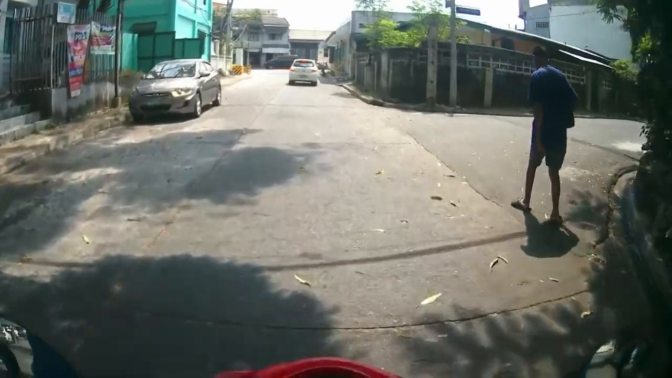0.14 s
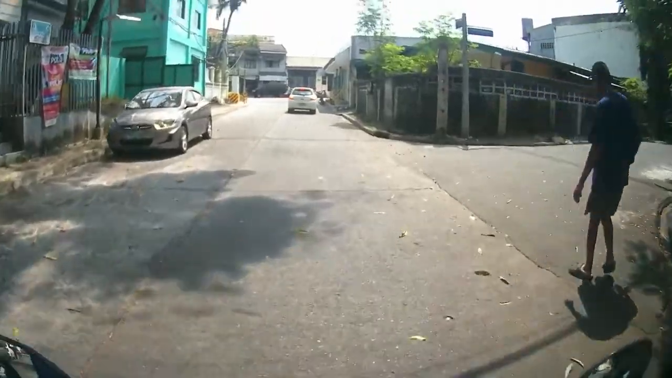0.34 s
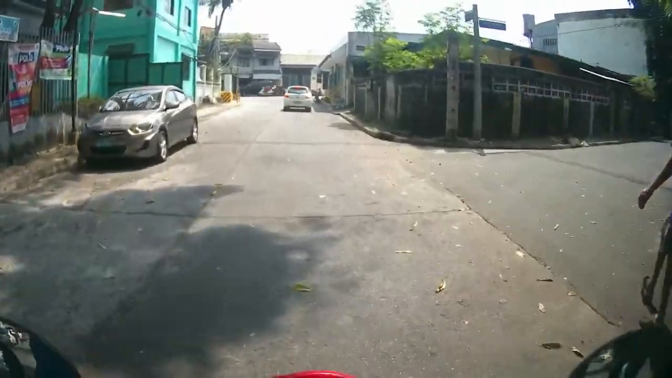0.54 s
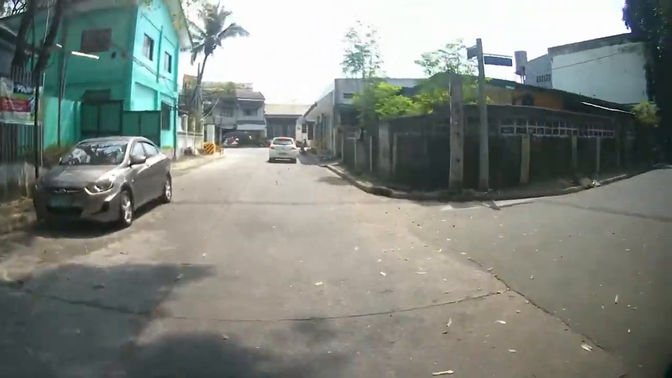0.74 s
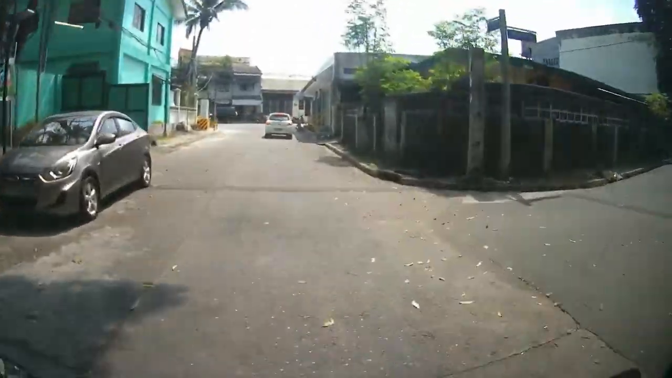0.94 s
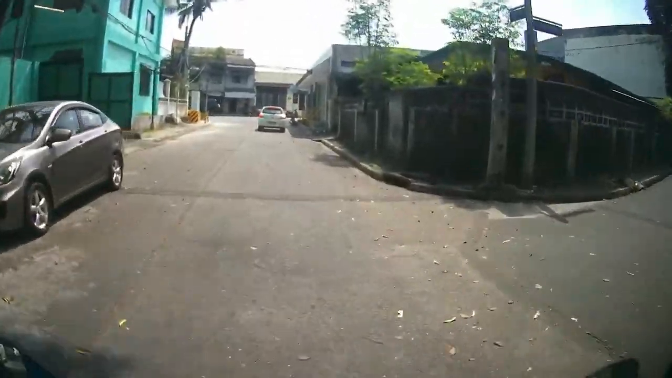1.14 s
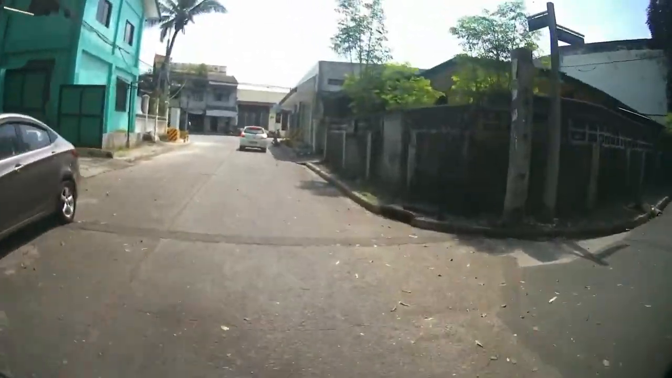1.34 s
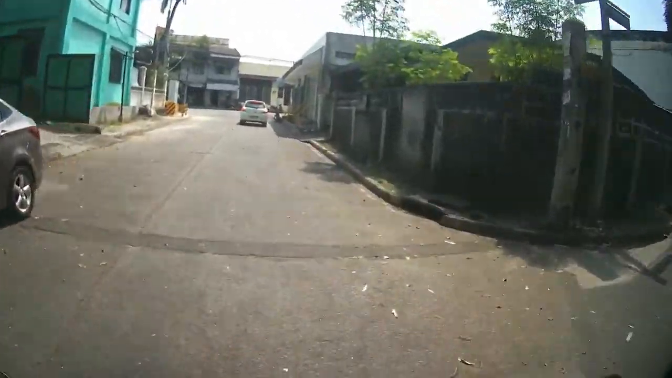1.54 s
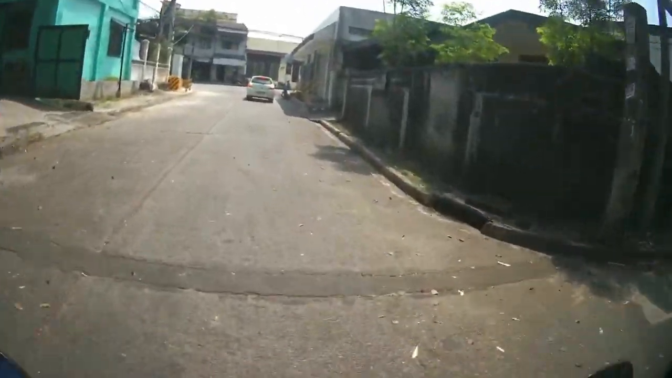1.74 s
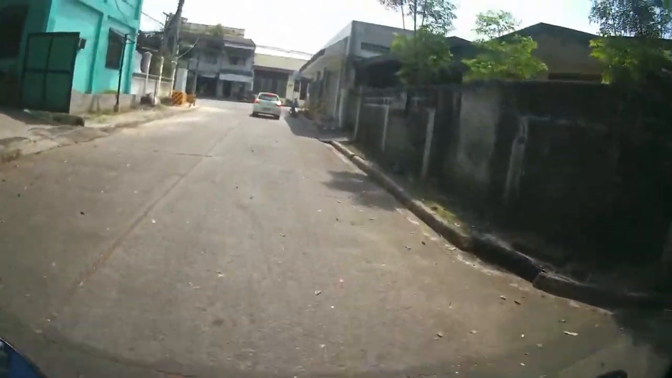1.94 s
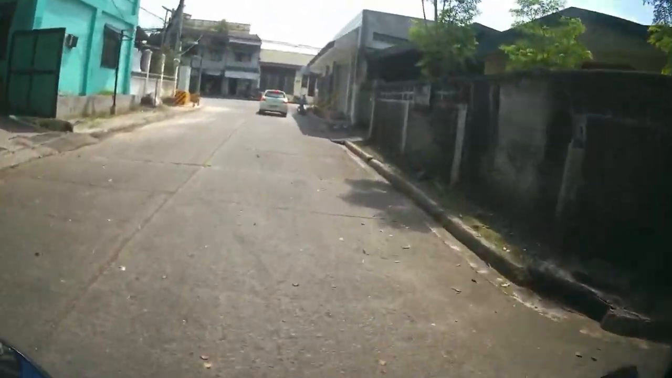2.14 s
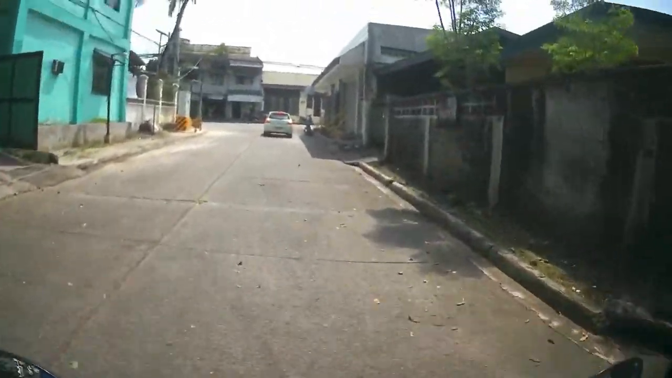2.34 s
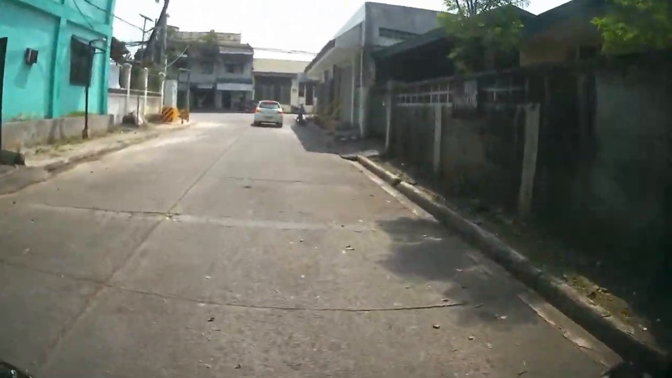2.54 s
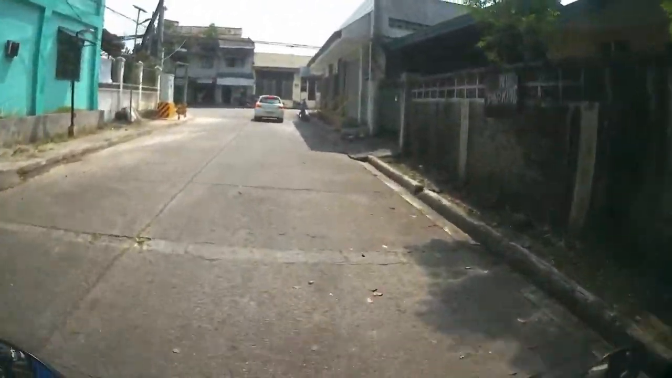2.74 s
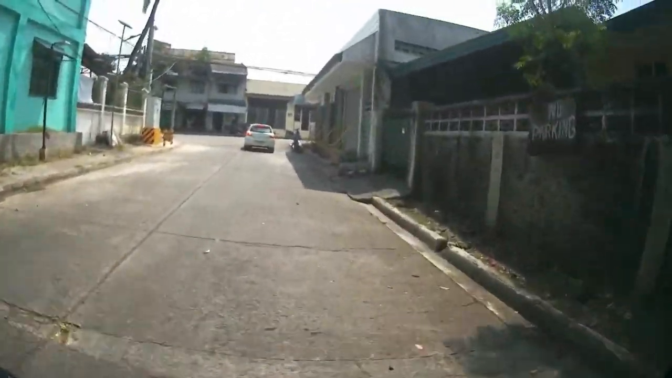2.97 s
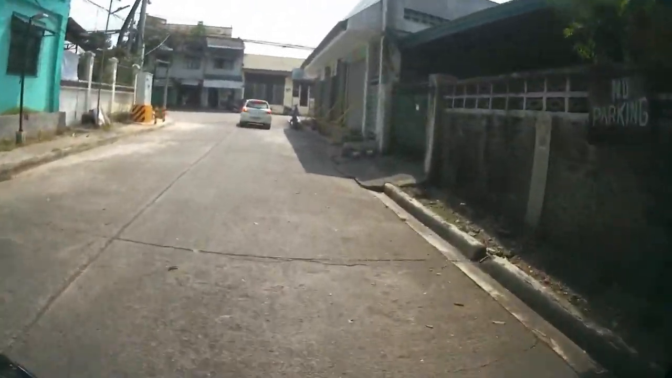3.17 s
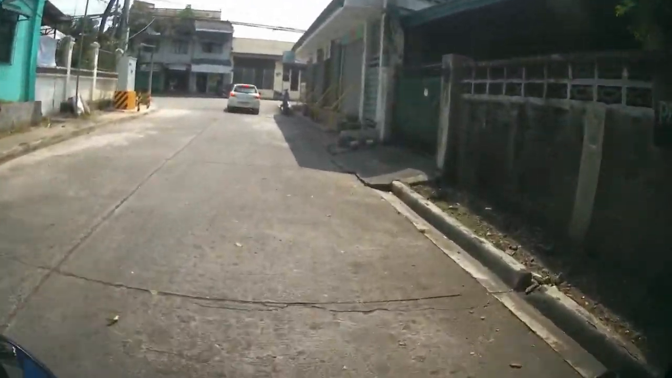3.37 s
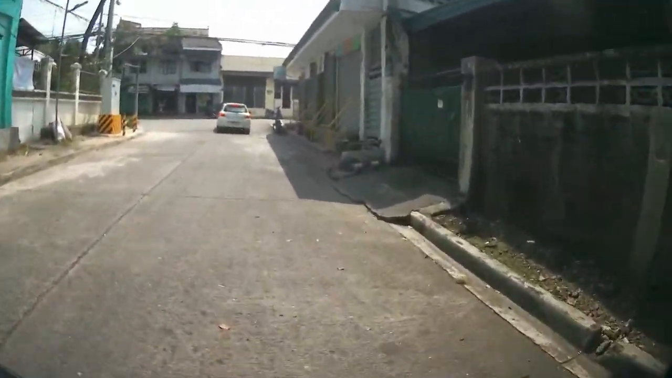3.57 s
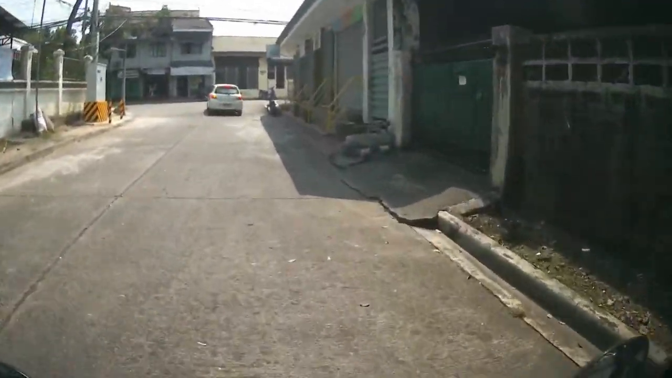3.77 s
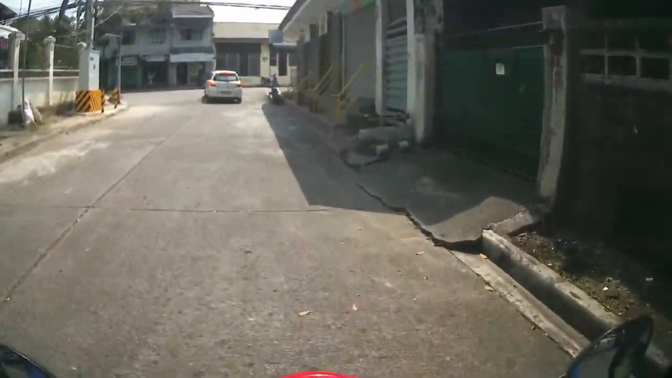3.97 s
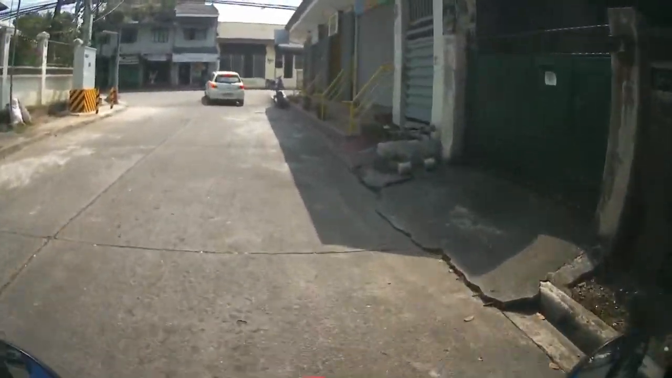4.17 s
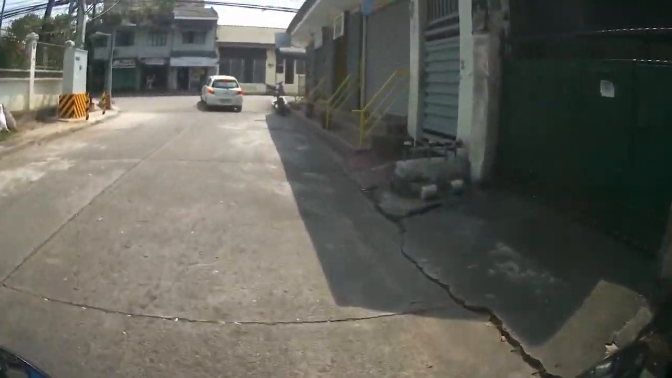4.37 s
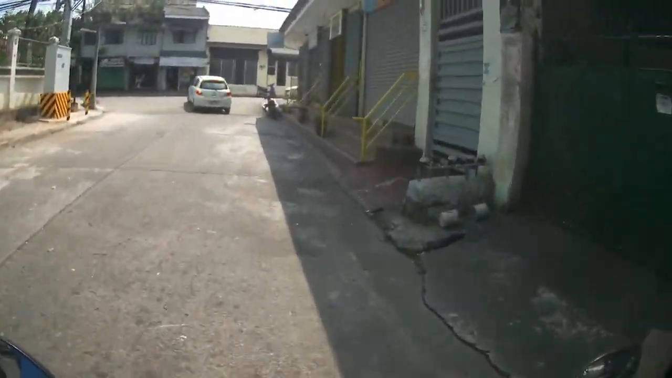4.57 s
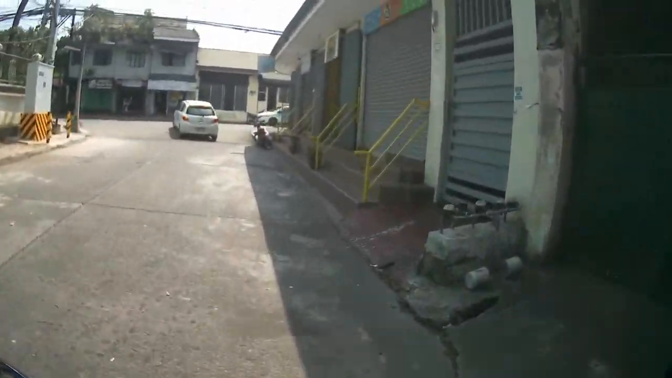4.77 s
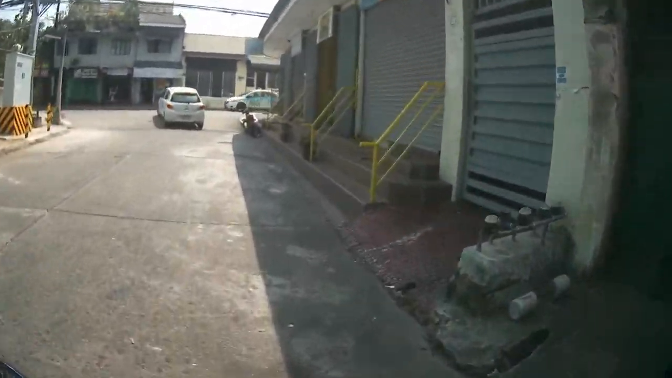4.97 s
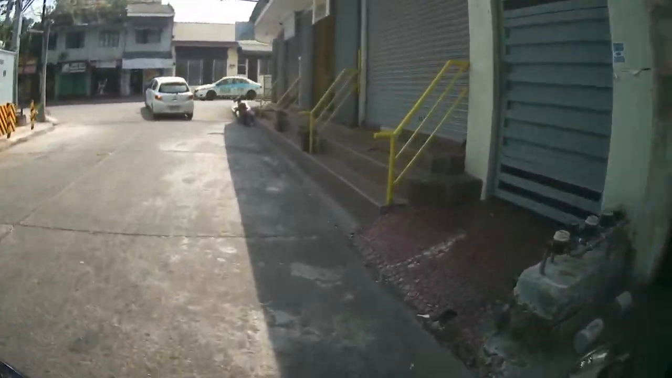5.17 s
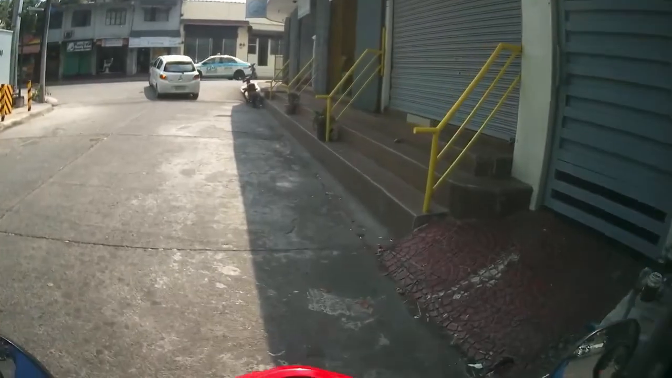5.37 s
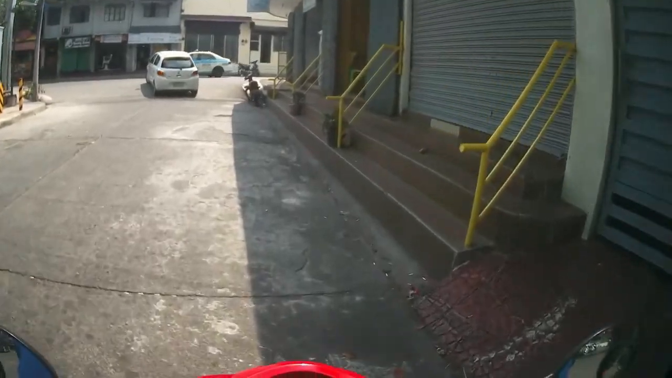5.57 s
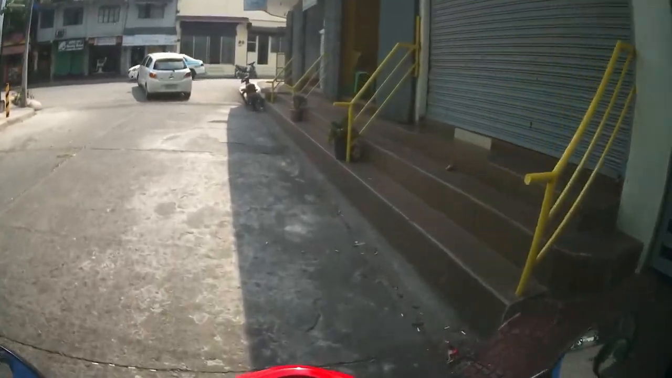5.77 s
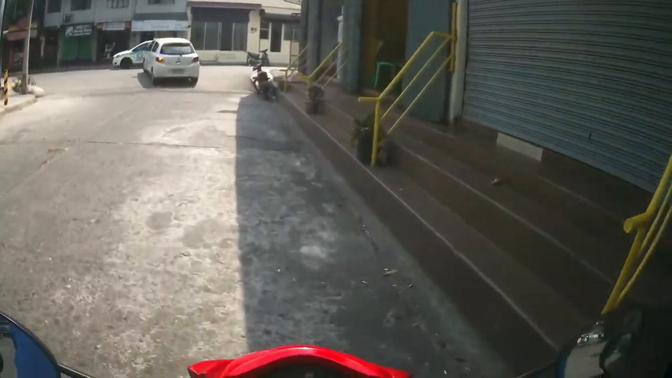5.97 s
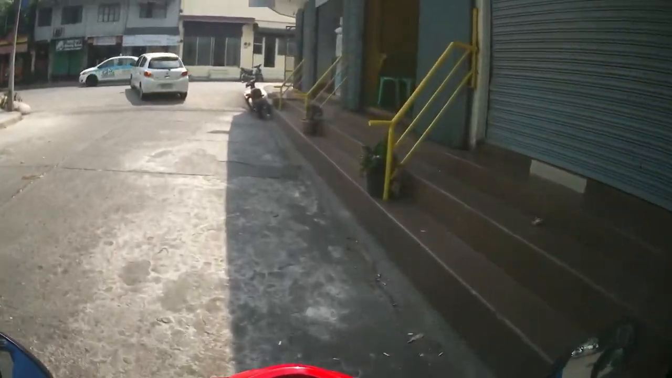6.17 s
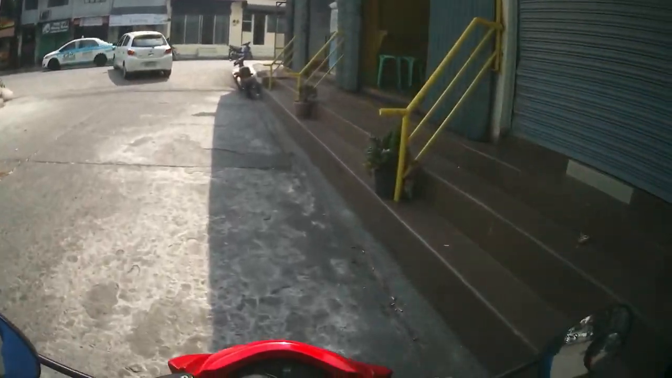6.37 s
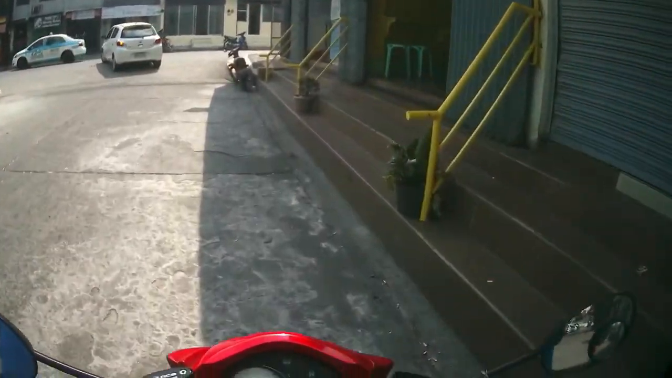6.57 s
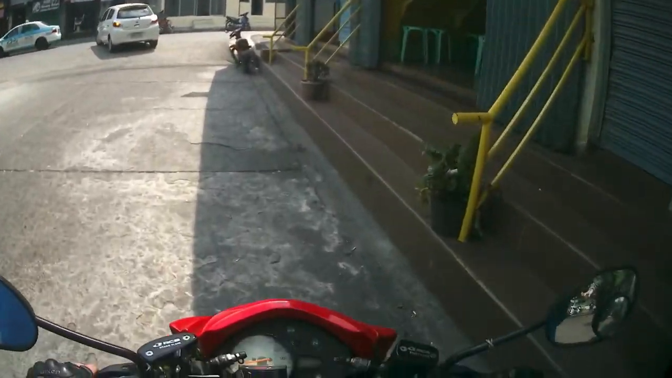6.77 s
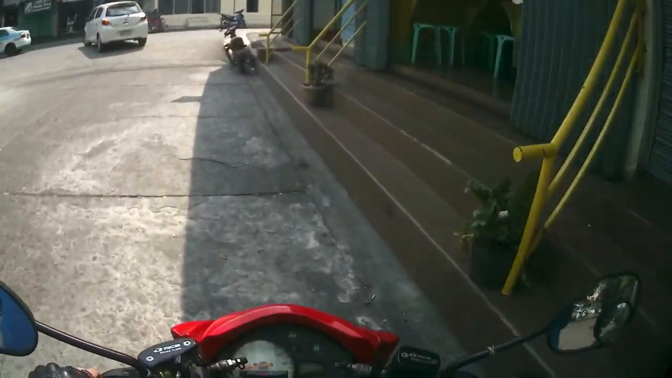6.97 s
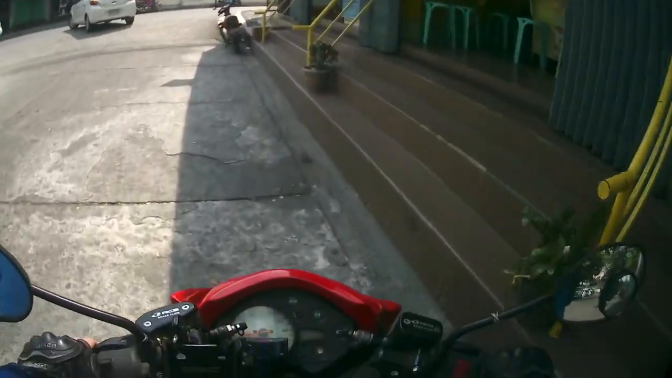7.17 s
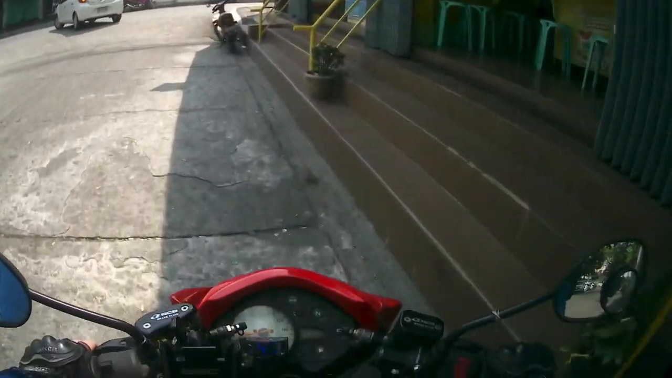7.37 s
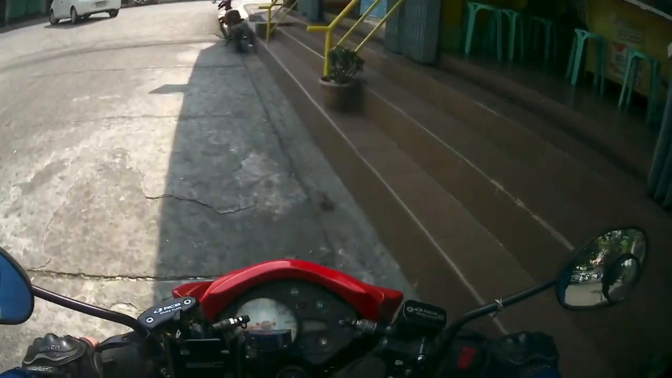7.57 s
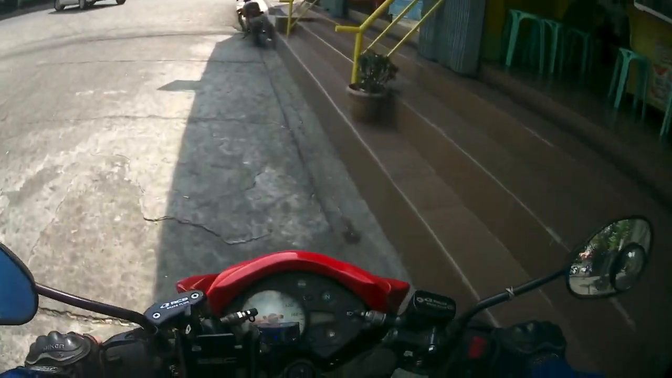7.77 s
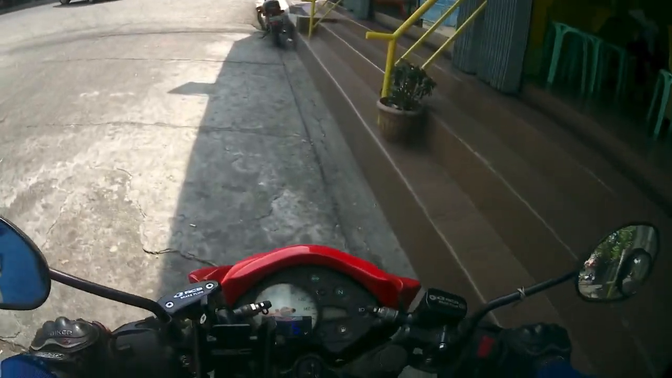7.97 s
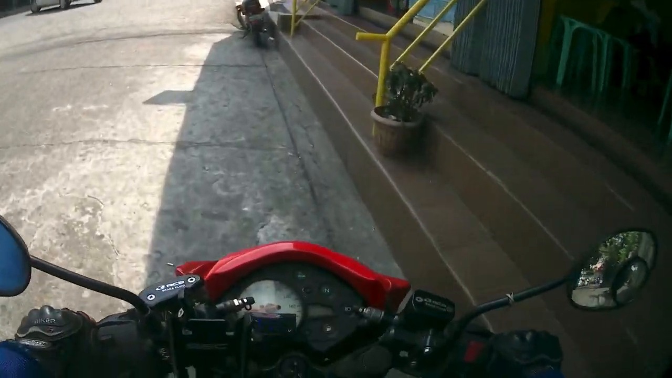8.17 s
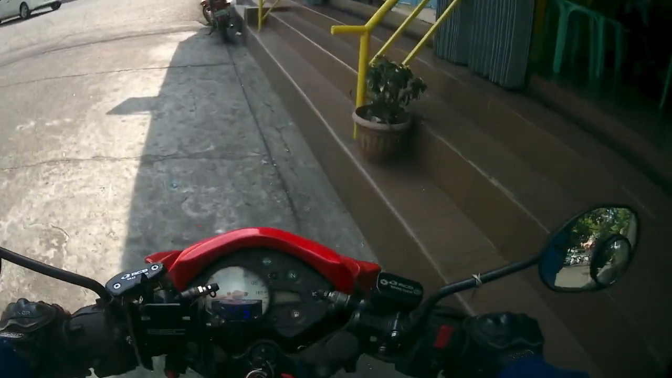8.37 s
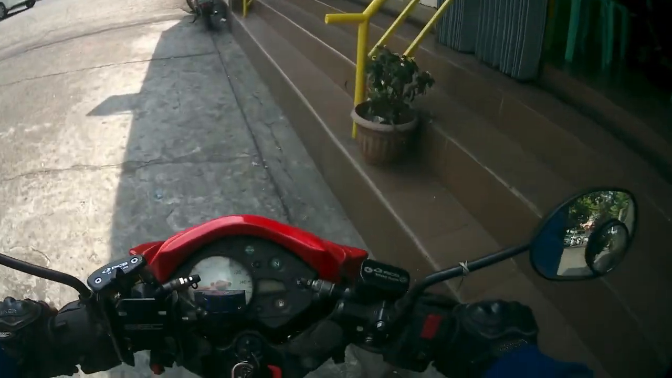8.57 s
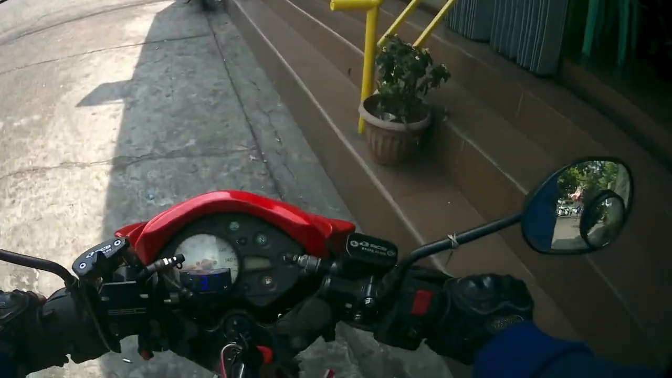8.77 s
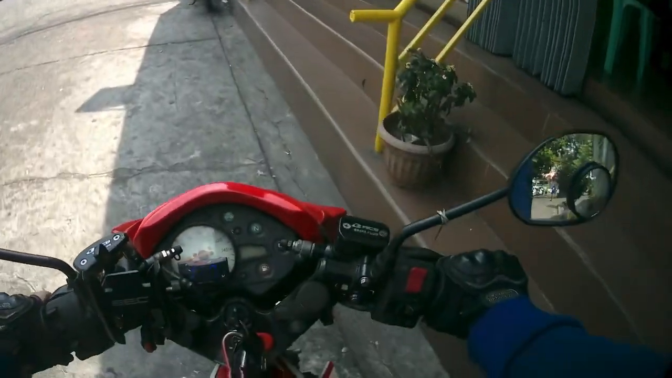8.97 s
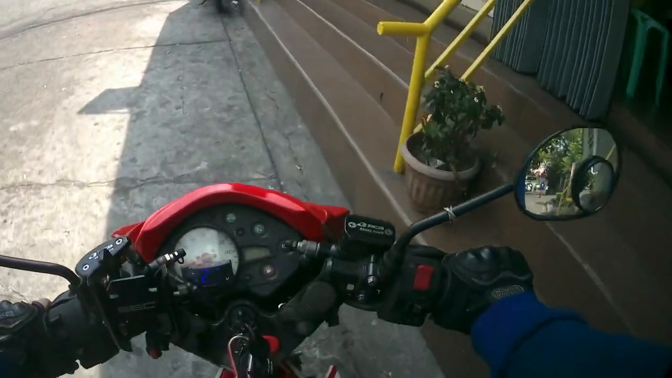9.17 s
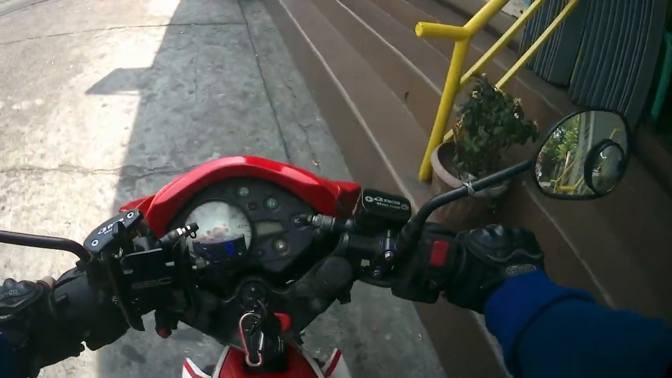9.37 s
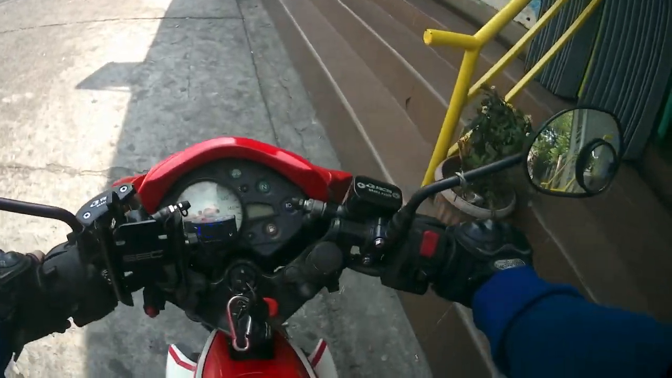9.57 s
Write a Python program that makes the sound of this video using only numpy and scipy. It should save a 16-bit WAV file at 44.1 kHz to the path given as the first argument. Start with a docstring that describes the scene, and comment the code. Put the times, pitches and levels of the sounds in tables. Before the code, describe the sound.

Heard from a helmet microphone inside a closed case, a small motorcycle rolls along a street. Deep buffeting and dull hiss surround a wavering low engine drone. The pitch sinks and the wind eases as the bike slows. After about seven seconds the drone becomes separate soft thuds, increasingly uneven, with small plastic ticks, faint brief peeps and a late rub of cloth.

```python
"""A small motorcycle slows to a stop, heard by a helmet camera in a closed case.
The engine is a sum of firing orders shaped by resonances of frame and helmet, then separate uneven thuds.
Wind is filtered noise: hiss in the case, buffeting of the helmet and a roar; a thin street hiss lies below.
Loose parts tick as struck resonances, cloth rubs as clumped noise, and faint sine tones peep.
The camera takes 8000 samples a second and joins them by straight lines, which leaves faint treble images."""
import sys
import numpy as np
from scipy import signal
from scipy.fft import rfft, irfft, next_fast_len
from scipy.io import wavfile
from scipy.ndimage import uniform_filter1d, map_coordinates

SR = 44100
rng = np.random.default_rng(int(sys.argv[2]) if len(sys.argv) > 2 else 0)


def wav_out(sig):
    """Save sig, one row per channel (or a flat mono array), as 16-bit PCM at SR to the path in sys.argv[1]."""
    wavfile.write(sys.argv[1], SR, np.round(np.clip(np.atleast_2d(sig).T, -1, 1) * 32767).astype(np.int16))


N = 423793

# Firing rate of the single cylinder: time_s, firings_per_s
FIRING_RATE = [(0, 47.99), (0.48, 42.09), (0.96, 45.12), (1.3, 42.72), (1.72, 44.94), (2.13, 40.24),
               (2.58, 43.17), (2.95, 41.34), (3.3, 43.21), (3.68, 38.8), (3.92, 39.63), (4.75, 33.43),
               (5.55, 27.98), (6.5, 22.69), (7.28, 18.04)]
# Phase lean that turns the beat from a push towards a pull: time_s, lean_rad
BEAT_LEAN = [(0, 0), (5.6, 0), (6.3, -1.2), (7, -2.4)]
# Swells added to the resting level of the deepest throb: start_s, length_s, level_db
THROB_SWELLS = [(.09, 0.21, -25.5), (0.403, 0.29, -23), (0.952, 0.18, -20.5), (1.297, .28, -26.5),
                (1.706, 0.3, -21), (2.356, 0.14, -30), (2.636, .82, -29), (3.6, .1, -23),
                (4.142, 0.14, -27.5), (4.617, .15, -37), (5.505, 1.02, -35.5)]
THROB_HZ, THROB_WIDTH_HZ, THROB_REST_DB, THROB_EDGE_S = 41, 13, -44.5, 0.05
# Level of the frame's drone: time_s, level_db
DRONE_LEVEL = [(0, -31), (.24, -19.5), (.42, -46), (.68, -53), (.78, -28.5), (1.08, -30), (1.2, -24.5),
               (1.42, -33), (1.62, -21), (1.88, -26), (2.02, -50), (2.45, -42), (2.55, -27), (3.42, -26),
               (3.52, -30), (3.62, -22), (3.8, -29.5), (4.3, -25), (4.72, -31.5), (5.1, -28.5),
               (5.6, -39.5), (6.2, -33), (7.28, -33.5)]
# Shifting centre of the drone: time_s, centre_hz
DRONE_CENTRE = [(0, 83.7), (3.5, 84), (3.62, 76), (4.7, 74), (4.85, 96), (5.8, 85.5), (6.3, 73),
                (7.28, 66.3)]
DRONE_WIDTH_HZ = 21
# Level of the helmet's hum: time_s, level_db
HUM_LEVEL = [(0, -29), (.24, -31.5), (.33, -20), (.72, -22), (.88, -26.5), (1.1, -36.5), (1.65, -39),
             (1.98, -24.5), (2.2, -20.5), (2.31, -26), (2.44, -22), (2.64, -35.5), (3.0, -31.5),
             (3.45, -34.5), (3.65, -29), (4.25, -24.5), (4.55, -31), (4.8, -28.5), (5.1, -26), (6.0, -30),
             (6.6, -33.5), (7.28, -44.5)]
HUM_HZ, HUM_WIDTH_HZ = 118.9, 25.5
# Level of a buzz above the hum: time_s, level_db
BUZZ_LEVEL = [(0, -29.5), (.4, -35.5), (.7, -43), (1.9, -39.5), (2.1, -39.5), (3.35, -36.5), (3.5, -51.5),
              (3.62, -26), (3.85, -39.5), (4.1, -31), (4.4, -43.5), (6.8, -55.5), (7.28, -43)]
BUZZ_HZ, BUZZ_WIDTH_HZ = 163.8, 21.5
# Spectrum of the orders above the buzz, before the load gain: frequency_hz, rms_db
UPPER_ORDERS = [(150, -71), (215, -46), (262, -42.5), (310, -50.5), (420, -57)]
# Load gain on those upper orders, lower overall as the engine slows: time_s, gain_db
LOAD_GAIN = [(0, -1), (1.95, 0), (2.1, -10), (2.7, -5), (3.5, -5), (4.5, -14), (5.2, -12.5), (7.28, -12)]
# Level of the tenth order, which sings for a while: time_s, level_db
TENTH_ORDER = [(0, -62.5), (2.4, -65), (2.9, -57), (4.7, -51), (5.2, -61), (7.3, -63.5)]

# Levels of the wind in the case: time_s, hiss_db, roar_db
WIND_LEVEL = [(0, -34.5, -46), (.48, -36, -40), (1.36, -38, -41.5), (2.49, -38.5, -43.5), (3.4, -38, -44),
              (4.07, -37.5, -44.5), (5.0, -43, -44.5), (5.49, -44.5, -48), (6.1, -46, -49),
              (7.55, -48, -51), (9.61, -50.5, -54)]
# Level of the helmet's buffeting: time_s, level_db
BUFFET_LEVEL = [(0, -27.5), (.5, -23.5), (2.24, -26.5), (2.49, -33), (3.37, -29), (5, -27.5), (6.07, -31.5),
                (7.55, -31), (9.61, -33.5)]
# Spectral shape of the hiss, before the case resonances: frequency_hz, relative_density_db
HISS_SPECTRUM = [(150, -23), (250, 0), (421, -12), (457, -13), (632, -14), (769, -12), (916, -13.5),
                 (1250, -12.5), (1420, -7.5), (1560, -10), (2160, -9.5), (2790, -20.5), (3720, -23),
                 (3990, -36.5), (5190, -69), (8780, -120)]
# Spectral shape of the buffeting: frequency_hz, relative_density_db
BUFFET_SPECTRUM = [(10, -10), (25, 4), (45, 2), (80, 0), (130, -3.5), (170, -12), (200, -17.5), (300, -52)]
# Spectral shape of the roar: frequency_hz, relative_density_db
ROAR_SPECTRUM = [(120, -43.5), (190, 1.5), (300, -9), (420, -12.5), (700, -27), (1200, -60.5)]
# Resonances of the air in the case: frequency_hz, width_hz, added_gain_db
CASE_MODES = [(1414.6, 66, 5.5), (1689, 42, -2.5), (1955, 27, -0.5), (1151, 140, -4.5)]

# Ticks of loose parts: start_s, knock_peak_db, pitch_hz, edge_relative_to_knock_db
TICKS = [(0.267, -25, 1270, 1), (0.559, -28, 860, -7.5), (2.337, -22.5, 997, -6), (2.927, -28.5, 757, -16),
         (5.198, -33.5, 1057, -5.5), (6.342, -30, 900, -14.5), (6.49, -29, 1014, -14),
         (6.727, -30.5, 1000, -14.5), (6.938, -33, 915, -6), (7.504, -31.5, 900, -13),
         (7.622, -36, 589, -2), (8.38, -33, 600, -15), (8.589, -33.5, 640, -11.5), (8.79, -36, 630, -9.5),
         (9.091, -35.5, 1160, -6), (9.151, -37.5, 600, -18), (9.19, -37, 1130, -10.5),
         (9.329, -38.5, 600, -14.5), (9.415, -35, 1070, -12.5), (9.562, -35.5, 835, -9)]
# Faint short tones: start_s, length_s, pitch_hz, rms_at_crest_db
PEEPS = [(6.29, 0.12, 840, -53), (8.03, 0.031, 905, -52), (8.04, 0.055, 2300, -53.5),
         (8.23, 0.046, 840, -53), (8.37, 0.083, 590, -51.5)]

# Walking pace: separate thuds at growing intervals
PACE_START_S, PACE_GAP_S, PACE_SLOWS_S, PACE_COUNT = 7.305, 0.05403, 0.00126, 20
PUSH_DB, PUSH_SCATTER_DB = -20.5, 1
KNOCK_DB, KNOCK_SCATTER_DB, KNOCK_FADE_DB = -25.5, 2.5, 0.3  # the fade is per thud
STUMBLES, STUMBLE_LATE_S, STUMBLE_LOSS_DB = [4, 8, 14], 0.008, 6  # thuds counted from 0
# Lone knocks halfway between thuds: chance, first level, and fade per thud interval
LONE_KNOCK_SHARE, LONE_KNOCK_DB, LONE_KNOCK_FADE_DB = 0.3, -24, 0.9
# The last uneven thuds: time_s, knock_peak_db, push_peak_db
LAST_THUDS = [(8.735, -32, -24), (8.8, -38, -24), (8.9, -28.5, -21.5), (8.925, -28, -38),
              (8.952, -43, -26.5), (8.999, -25, -22.5), (9.051, -45, -27), (9.198, -35, -24.5),
              (9.221, -25.5, -23), (9.414, -26.5, -21), (9.44, -25, -26), (9.461, -42, -33)]

# Level of cloth brushing the case: time_s, level_db
RUSTLE_LEVEL = [(8.84, -80.5), (8.87, -50), (8.94, -50.5), (8.97, -80), (9.13, -81.5), (9.155, -45.5),
                (9.22, -45), (9.26, -46.5), (9.3, -44), (9.37, -48), (9.4, -60.5), (9.45, -75)]
# Spectral shape of the cloth, before the case resonances: frequency_hz, relative_density_db
CLOTH_SPECTRUM = [(150, -29.5), (300, 2), (600, -4), (1200, -4.5), (2500, -12), (3900, -18.5)]

CAMERA_HZ = 8000  # samples a second
TOP_HZ = 15850  # upper limit of the output


def amp(db):
    """Decibels are twenty times the logarithm of an amplitude ratio."""
    return 10 ** (np.asarray(db) / 20)


def unit(x):
    """Division by the root mean square gives a signal of rms 1."""
    return x / np.sqrt(np.mean(x ** 2) + 1e-20)


def along(points, hz):
    """A spectrum is interpolated linearly over the logarithm of frequency."""
    f, value = np.transpose(points)
    return np.interp(np.log(hz + 1), np.log(f + 1), value)


def curves(rows):
    """Linear interpolation in time gives one value per sample for each column after the time."""
    s, *columns = np.transpose(rows)
    return [np.interp(np.arange(N) / SR, s, column) for column in columns]


def wobble(rate):
    """A spline through random knots, rate of them a second, makes a smooth fluctuation."""
    knots = rng.standard_normal(int(N * rate / SR) + 4)
    return map_coordinates(knots, [np.arange(N) * rate / SR])


def filtered(x, response):
    """A linear filter multiplies the spectrum by its complex response."""
    m = next_fast_len(N + SR // 2)  # padding for the decay
    return irfft(rfft(x, m) * response(np.fft.rfftfreq(m, 1 / SR)), m)[:N]


def resonance(hz, width_hz):
    """A damped oscillator responds causally, with gain 1 at its centre."""
    return lambda f: 1j * f * width_hz / (hz * hz - f * f + 1j * f * width_hz)


def rush(response, patchy_db):
    """Turbulence as coloured noise of rms 1, with random gain in patches of time and frequency."""
    spectrum = signal.stft(rng.standard_normal(N), nperseg=512)[2]
    field = rng.standard_normal(spectrum.shape)
    field = uniform_filter1d(uniform_filter1d(field, 5, 0), 8, 1)
    patchy = signal.istft(spectrum * amp(patchy_db * unit(field)), nperseg=512)[1][:N]
    return unit(filtered(patchy, response))


def throb():
    """Superposed gates: a resting amplitude plus swells that rise, hold and fall."""
    t = np.arange(N) / SR
    level = amp(THROB_REST_DB)
    for start, length, db in THROB_SWELLS:
        nearest_end = np.minimum(t - start, start + length - t)
        level = level + amp(db) * np.clip(nearest_end / THROB_EDGE_S + 0.5, 0, 1)
    return level


def engine(flutter_db=1.32, skirt_db=6, size=64):
    """Fourier synthesis: orders in step sum to one rounded beat a firing, weighted by resonances."""
    t = np.arange(N) / SR
    coarse = slice(None, None, size)  # levels are computed every size samples
    (rate,), (lean,) = curves(FIRING_RATE), curves(BEAT_LEAN)
    tables = (DRONE_LEVEL, HUM_LEVEL, BUZZ_LEVEL, LOAD_GAIN, TENTH_ORDER)
    drone, hum, buzz, load, tenth = (amp(curves(table)[0][coarse]) for table in tables)
    drone_hz = curves(DRONE_CENTRE)[0][coarse]
    bodies = [(throb()[coarse], THROB_HZ, THROB_WIDTH_HZ), (drone, drone_hz, DRONE_WIDTH_HZ),
              (hum, HUM_HZ, HUM_WIDTH_HZ), (buzz, BUZZ_HZ, BUZZ_WIDTH_HZ)]

    def carried(f):
        """Resonant transmission: each body's gain is skirt_db lower one width from its centre."""
        upper = load * amp(along(UPPER_ORDERS, f))
        return upper + sum(gain * amp(-skirt_db * ((f - hz) / width) ** 4) for gain, hz, width in bodies)

    levels = [carried(k * rate[coarse]) for k in range(1, 10)] + [tenth]
    # phase is the running sum of the rate, with a slight random jitter
    turn = 2 * np.pi * np.cumsum(rate) / SR + 0.55 + 0.05 * wobble(12)
    beat = np.zeros(N)
    for k, coarse_level in enumerate(levels, start=1):
        level = np.interp(t, t[coarse], coarse_level) * amp(flutter_db * wobble(14))
        beat += level * np.cos(k * turn + lean + 0.14 * wobble(8.1))
    # regular firing gives way to separate thuds
    regular = np.clip((FIRING_RATE[-1][0] - t) / 0.02, 0, 1)
    return np.sqrt(2) * regular * beat  # from rms to peak


def case(f):
    """Cavity resonance: the air in the case adds gain at its modes."""
    return 1 + sum(amp(db) * np.abs(resonance(hz, width)(f)) ** 2 for hz, width, db in CASE_MODES)


def wind():
    """Turbulent noise: hiss coloured by the case, lumpy buffeting of the helmet, a roar between them."""
    (hiss_db, roar_db), (buffet_db,) = curves(WIND_LEVEL), curves(BUFFET_LEVEL)
    hiss_level = amp(hiss_db + 0.8 * wobble(8) + 0.34 * wobble(25))
    hiss = hiss_level * rush(lambda f: amp(along(HISS_SPECTRUM, f)) * case(f), patchy_db=1.0)
    lumps = amp(1.6 * wobble(10.0))
    pressure = rush(lambda f: amp(along(BUFFET_SPECTRUM, f)), patchy_db=-0.14)
    buffet = amp(buffet_db) * unit(lumps * pressure)
    roar = amp(roar_db) * rush(lambda f: amp(along(ROAR_SPECTRUM, f)), patchy_db=2.0)
    return hiss + buffet + roar


def street(db=-61):
    """Masking: a thin hiss about one steady level comes forward as the wind drops."""
    level = amp(db + 1.7 * wobble(5.5))
    return level * rush(lambda f: resonance(2300, 600)(f) ** 2, patchy_db=4.0)


def ticks(width_hz=750):
    """Impact excitation: a contact and short rattle ring a dull resonance, plus a brighter edge."""
    out, t = np.zeros(N + SR), np.arange(SR // 10) / SR
    f = np.fft.rfftfreq(len(t), 1 / SR)
    peak = lambda x: x / np.abs(x).max()
    for s, db, hz, edge_db in TICKS:
        rattle = rng.standard_normal(len(t)) * amp(-60 * t / 0.029)  # falls 60 dB in 29 ms
        burst = 1 + 0.095 * rfft(rattle)  # the 1 is one sharp contact
        body = resonance(hz, width_hz)(f) ** 2 + 0.5 * resonance(1350, 600)(f) ** 2
        knock = irfft(burst * body, len(t))
        edge = irfft(burst * resonance(2400, 2600)(f) ** 2, len(t))
        out[round(s * SR):][:len(t)] += amp(db) * (peak(knock) - amp(edge_db) * peak(edge))
    return out[:N]


def peeps():
    """Amplitude modulation: half a sine shapes each pure tone, so that it swells and fades."""
    out = np.zeros(N)
    for s, length, hz, db in PEEPS:
        t = np.arange(round(length * SR)) / SR
        swell = amp(db) * np.sqrt(2) * np.sin(np.pi * t / length)
        out[round(s * SR):][:len(t)] += swell * np.sin(2 * np.pi * hz * t)
    return out


def thuds():
    """Slowing firing intervals, with late weak stumbles and lone knocks: rows time_s, knock_db, push_db."""
    k = np.arange(PACE_COUNT)
    chance, late = rng.standard_normal((PACE_COUNT, 2)), np.isin(k, STUMBLES)
    gap = PACE_GAP_S + PACE_SLOWS_S * k
    s = PACE_START_S + np.cumsum(gap) - gap
    loss_db = STUMBLE_LOSS_DB * late
    knock_db = KNOCK_DB - KNOCK_FADE_DB * k + KNOCK_SCATTER_DB * chance[:, 0] - loss_db
    push_db = PUSH_DB + PUSH_SCATTER_DB * chance[:, 1] - loss_db
    run = np.c_[s + STUMBLE_LATE_S * late, knock_db, push_db]
    faint_push_db = np.full(PACE_COUNT, 2 * LONE_KNOCK_DB)
    lone = np.c_[s + gap / 2, LONE_KNOCK_DB - LONE_KNOCK_FADE_DB * k, faint_push_db]
    return [*run, *lone[rng.random(PACE_COUNT) < LONE_KNOCK_SHARE], *LAST_THUDS]


def idle(push_hz=62, knock_hz=125, spread_s=0.0087, lean_rad=-2.48):
    """Gaussian wave packets: each late thud is a deep push with a higher knock on top."""
    out, t = np.zeros(N + SR), np.arange(-SR // 20, SR // 20) / SR
    knock = np.cos(2 * np.pi * knock_hz * t + lean_rad) * np.exp(-0.5 * (t / spread_s) ** 2)
    push = np.cos(2 * np.pi * push_hz * t + lean_rad) * np.exp(-0.5 * (t / (0.95 * spread_s)) ** 2)
    for s, knock_db, push_db in thuds():
        out[round(s * SR) - SR // 20:][:len(t)] += amp(knock_db) * knock + amp(push_db) * push
    return out[:N]


def rustle():
    """Friction noise: cloth rubs in irregular clumps, coloured by the case."""
    db, = curves(RUSTLE_LEVEL)
    clumps = amp(2.2 * wobble(60))
    return amp(db) * clumps * rush(lambda f: amp(along(CLOTH_SPECTRUM, f)) * case(f), patchy_db=1.5)


def scene():
    """Superposition: the sound pressures of all sources add."""
    return (engine() + wind() + street() + ticks() + peeps() + idle() + rustle())[None]


def record(dry):
    """Sampling: few samples joined by straight lines leave faint mirror images in the treble."""
    t = np.arange(N) / SR
    narrow = filtered(dry[0], lambda f: f < CAMERA_HZ / 2)
    sample_times = np.arange(int(N / SR * CAMERA_HZ) + 1) / CAMERA_HZ
    samples = map_coordinates(narrow, [sample_times * SR], mode="nearest")
    joined = np.interp(t, sample_times, samples)
    return filtered(joined, lambda f: f < TOP_HZ)[None]


dry = scene()
out = record(dry)
wav_out(out)
```